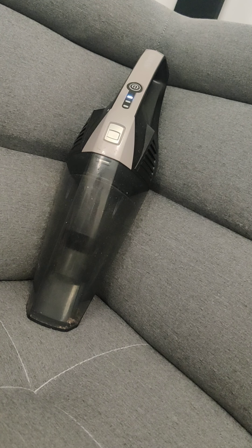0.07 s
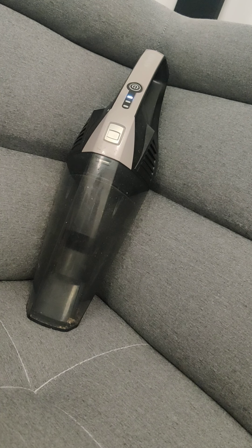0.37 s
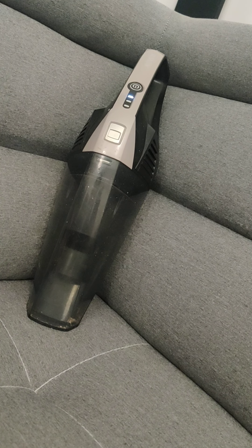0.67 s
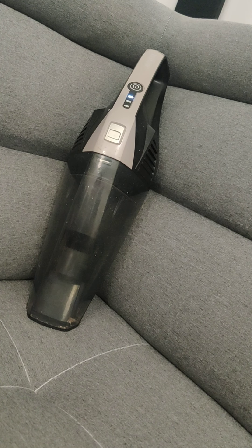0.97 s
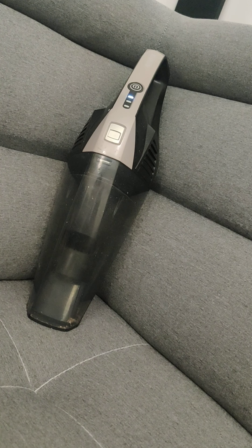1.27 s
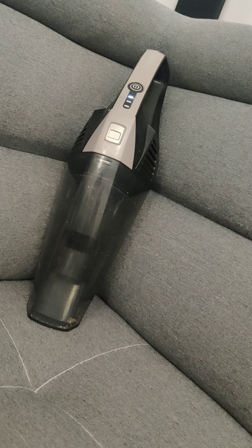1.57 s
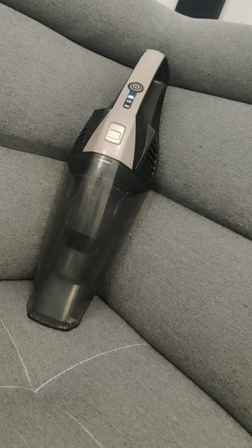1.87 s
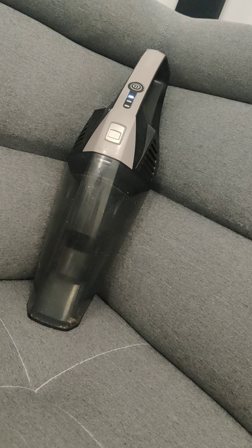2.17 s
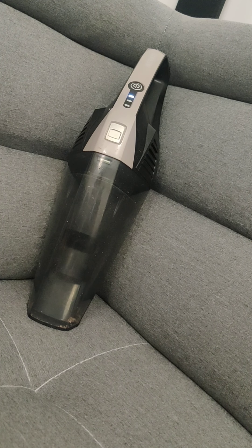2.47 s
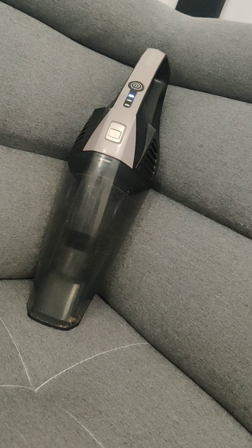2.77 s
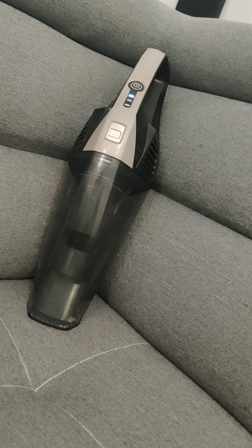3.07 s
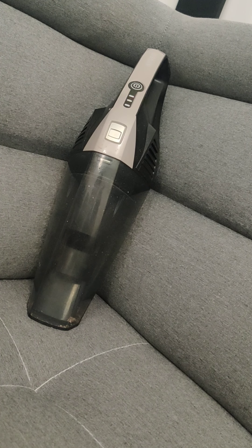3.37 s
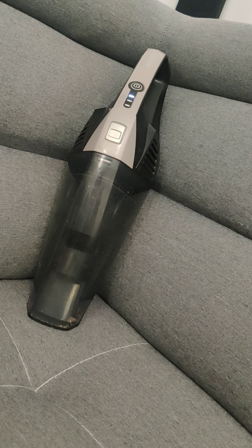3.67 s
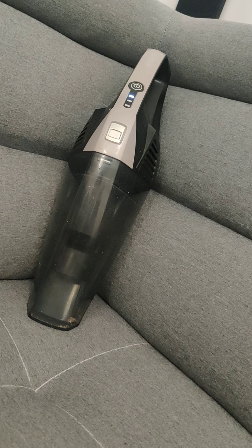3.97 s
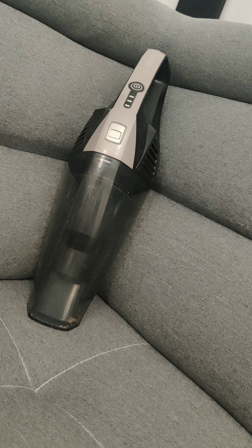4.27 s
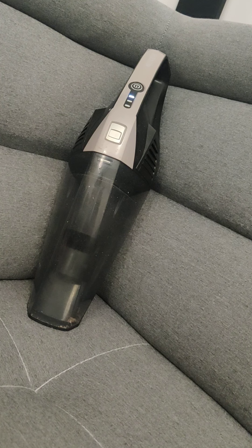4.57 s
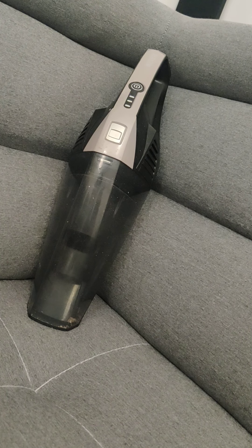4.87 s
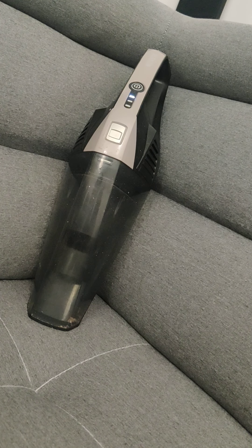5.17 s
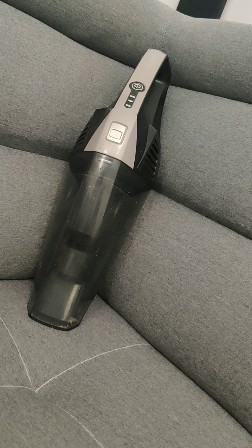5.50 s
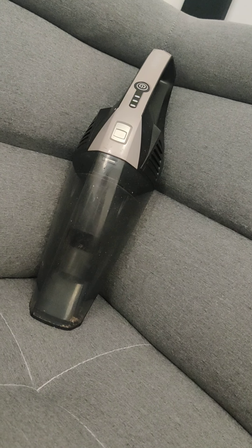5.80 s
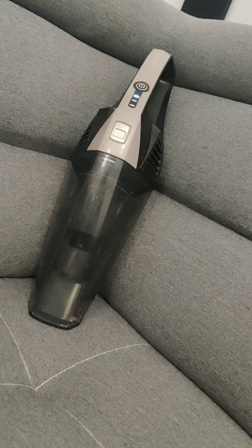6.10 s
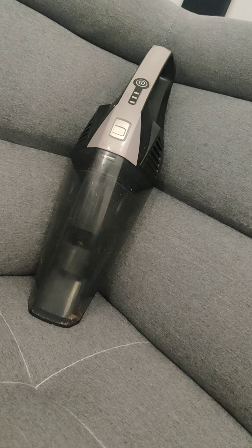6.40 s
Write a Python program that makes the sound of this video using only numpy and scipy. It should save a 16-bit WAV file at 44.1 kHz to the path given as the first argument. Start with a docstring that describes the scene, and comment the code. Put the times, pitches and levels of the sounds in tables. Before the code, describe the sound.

A handheld vacuum runs with a wavering high whine and rushing air, then switches off and winds down to a low hum.

```python
"""A cordless hand vacuum lies on a sofa, its seven-blade fan whining as the motor speeds up and slows.
After three seconds the power is cut: the rush of air dies, the whine glides down, and the bearings
and the off-balance rotor are left humming. Under it are a faint room hiss and a few deep hand bumps.
Near the end something soft, like a sleeve, brushes close to the microphone."""
import sys
import numpy as np
from scipy import signal
from scipy.fft import rfft, irfft, next_fast_len
from scipy.io import wavfile

SR = 44100
rng = np.random.default_rng(int(sys.argv[2]) if len(sys.argv) > 2 else 0)


def digitize_waveform(pressure):
    """Quantize a signal to 16-bit integers and store it at the path in sys.argv[1].

    Rows of a 2-D input are taken as channels; values are limited to [-1, 1].
    """
    field = np.atleast_2d(pressure).T
    bounded = np.clip(field, -1, 1)
    quanta = np.round(bounded * 32767).astype(np.int16)
    wavfile.write(sys.argv[1], SR, quanta)


N = 292804
TIME = np.arange(N) / SR
FFT_SIZE = next_fast_len(N, True)
BIN_HZ = np.maximum(np.arange(FFT_SIZE // 2 + 1) * SR / FFT_SIZE, 1)

# How strongly the air outlet rings with the whine. Each row: pitch in Hz, level in dB.
WHINE_LEVELS = [(560, -75), (720, -59.5), (900, -63), (1050, -48), (1280, -44), (1400, -39), (1680, -34),
                (1820, -44.5), (2020, -45), (2280, -49.5), (2410, -42.5), (2490, -35), (2560, -28.5),
                (2640, -29)]
# Higher notes of the whine. Each row: multiple of its pitch, full-speed level in dB before the
# housing's boost, power of the speed by which it grows.
WHINE_OVERTONES = [(2, -51, 17), (3, -43, 6.6), (4, -54.5, 16)]
# Where the ducts and housing ring or dampen. Each row: centre in Hz, width in Hz,
# boost in dB for the air rush and overtones, boost in dB for the rattle.
HOUSING_RESONANCES = [(219, 27, 4, -2), (343.5, 40, 11.5, -3), (1607, 232, 10.5, 20), (2625, 290, 7.5, 6),
                      (4210, 280, 7, 2.5), (4700, 320, 0, -7), (5190, 350, 4.5, 11), (6170, 320, 7, 3),
                      (7390, 730, 2.5, -3), (10550, 520, 2, -2)]
# Tone colour of the rushing air before the housing. Each row: frequency in Hz, relative level in dB.
AIR_SPECTRUM = [(30, -22), (70, -18), (120, -6.5), (145, -20), (178, 1.5), (280, 4), (400, -2.5), (750, -3),
                (900, -10), (1100, -6.5), (1400, -6), (2150, -16.5), (2900, -5), (3700, -11), (7700, -9),
                (8500, -15.5), (15500, -23)]
# Tone colour of the rolling bearing balls. Each row: frequency in Hz, relative level in dB.
RUMBLE_SPECTRUM = [(40, -13), (75, -34), (102, -14.5), (120, -7.5), (145, -13), (210, -1.5), (370, -2.5),
                   (480, 2), (620, -9.5), (760, -10), (1000, -24), (2100, -30.5), (8000, -53), (15000, -47)]
# Tone colour of the rattle before the housing. Each row: frequency in Hz, relative level in dB.
RATTLE_SPECTRUM = [(300, -3), (1000, 8.5), (2100, -1), (3000, 6), (4500, 2), (7500, -18), (9000, -26),
                   (15000, -15)]
# How strongly the body and room ring with the hum. Each row: turns per second, level in dB.
HUM_LEVELS = [(79, -67), (88, -48), (95, -33.5), (101, -35), (106.5, -45.5), (112, -37.5), (120, -45),
              (128, -39.5), (150, -51.5), (200, -47), (235, -40.5), (260, -41), (325, -28.5), (345, -37),
              (377, -34)]
# Tone colour of the room and microphone hiss. Each row: frequency in Hz, relative level in dB.
BACKGROUND_SPECTRUM = [(12, -4), (30, 10), (60, 6), (300, 10), (500, -7), (900, -15), (3000, -14),
                       (9000, -20), (15000, -14)]
# Bumps of the hand on the microphone. Each row: peak time in seconds, level in dB, half length in seconds.
HAND_BUMPS = [(1.75, -40, .03), (1.92, -46, 0.087), (6.03, -48, 0.065), (6.455, -51, 0.11)]
# Notes that come and go as the rotor slows. Each row: multiple of the rotor speed, peak level in dB,
# turns per second at that peak, width in octaves.
COASTING_NOTES = [(14, -43.5, 301, 0.1), (14, -48, 255, 0.084), (2, -41, 249, 0.16), (2, -47, 169, 0.23),
                  (2.58, -47.5, 180, 0.096), (2.58, -45.5, 148.5, 0.3), (3, -50, 128, 0.39),
                  (3.58, -50.5, 119, 0.43)]
# Tone colour of rubbing cloth. Each row: frequency in Hz, relative level in dB.
CLOTH_SPECTRUM = [(40, 13), (200, 2), (700, 2), (1150, 8.5), (1600, 0), (2200, -1.5), (3000, -3),
                  (4500, -4.5), (6500, -1), (7700, -1.5), (8600, -16), (15000, -9)]
# How much louder the left side is than the right. Each row: frequency in Hz, level gap in dB.
LEFT_BOOST = [(40, 6), (100, 0.5), (122, -6.5), (160, 1), (220, 0), (380, 3), (700, -0.5), (1300, 2.5),
              (2500, 4.5), (4400, 5.5), (6300, -2.5), (7800, -1), (9500, 3.5), (15000, 1.5)]
# How far the left side's wave runs ahead. Each row: frequency in Hz, phase in radians.
LEFT_LEAD = [(0, 0), (330, 0.61), (780, 1.5), (1400, 3), (2150, 6.5), (2650, 7.5), (5170, 11.5),
             (6120, 12.5), (7580, 17), (10400, 26), (16000, 36.5)]
# How much of the sound both sides have in common. Each row: frequency in Hz, share from 0 to 1.
STEREO_SHARE = [(60, 1), (300, 1), (750, 1), (1500, 0.64), (2100, 0.32), (3000, 0.76), (5200, 0.37),
                (6200, 0.67), (7100, 0.3), (15000, 0.17)]

BLADES, FULL_SPEED_HZ = 7, 360  # rotor speeds are in turns per second
POWER_OFF_S = 3.0


def from_db(db):
    """Turn decibels into a gain to multiply by."""
    return 10 ** (np.asarray(db) / 20)


def unit_power(x):
    """Scale a signal to an average power of 1."""
    return x / np.sqrt(np.mean(x ** 2) + 1e-20)


def look_up(table, hz):
    """Read between a table's rows, with octaves evenly spaced."""
    row_hz, value = np.transpose(table)
    return np.interp(np.log(hz), np.log(row_hz), value)


def drift(rate_hz, count=1):
    """Rows of smooth random wandering, typically about 1 in size."""
    white = rfft(rng.standard_normal((count, FFT_SIZE)))
    return unit_power(irfft(white / (1 + (BIN_HZ / rate_hz) ** 2), FFT_SIZE)[:, :N])


def swell_at(peak_s, db, rise_s, fall_s):
    """A bell-shaped gain with its own rise and fall times."""
    return from_db(db) * np.exp(-((TIME - peak_s) / np.where(TIME < peak_s, rise_s, fall_s)) ** 2)


def gain_by_speed(speed, db, loudest_hz, growth, easing):
    """A gain that grows as a power of the speed up to its peak, then eases off."""
    ratio = speed / loudest_hz
    return from_db(db) * np.minimum(ratio ** growth, ratio ** -easing)


def stereo_gains(hz):
    """Level and phase for each side: sound reaches the left first, and mostly louder."""
    row_hz, radians = np.transpose(LEFT_LEAD)
    side = np.array([[.5], [-.5]])
    lead = np.interp(hz, row_hz, radians)
    return from_db(look_up(LEFT_BOOST, hz) * side) * np.exp(1j * side * lead)


def stereo_blend(rows, hz):
    """Mix three random signals into two: the first is shared, the others go to one side each."""
    share = look_up(STEREO_SHARE, hz)
    return np.sqrt(share) * rows[0] + np.sqrt(1 - share) * rows[1:]


def noise(spectrum_db):
    """Stereo noise with the given tone colour and a power of 1."""
    white = stereo_blend(rfft(rng.standard_normal((3, FFT_SIZE))), BIN_HZ)
    coloured = white * stereo_gains(BIN_HZ) * from_db(spectrum_db)
    return unit_power(irfft(coloured, FFT_SIZE)[:, :N])


def tone(hz, rough, flutter_hz):
    """A gliding note whose strength and phase are shaken by churning air."""
    flutter = drift(flutter_hz, count=3) + 1j * drift(flutter_hz, count=3)
    shake = 1 + rough * stereo_blend(flutter, hz)
    wave = np.exp(2j * np.pi * np.cumsum(hz) / SR)
    keep_power = np.sqrt(2 / (1 + 2 * rough ** 2))
    return keep_power * np.real(shake * stereo_gains(hz) * wave)


def housing_boost(hz):
    """The housing's ringing as two boosts in dB: one for air sounds, one for the rattle."""
    centre, width, *boosts = np.transpose(HOUSING_RESONANCES)
    distance = (hz - centre[:, None]) / width[:, None]
    return np.array(boosts) @ np.exp(-2 * np.minimum(distance ** 2, 20))


def rotor_speed(running_hz=360.8, swing_hz=15.2, period_s=0.416, first_peak_s=0.339):
    """The speed zigzags under power, then falls as air drag and steady friction brake the rotor."""
    sharpness = 0.97  # near 0 is a smooth wave, 1 is a pointed zigzag
    cycle = 2 * np.pi * (np.minimum(TIME, POWER_OFF_S) - first_peak_s) / period_s
    driven = running_hz + swing_hz * np.arcsin(sharpness * np.cos(cycle)) / np.arcsin(sharpness)
    drag, friction = 155.8, 29.83  # Hz lost per second at full speed; drag goes as speed squared
    even_hz = FULL_SPEED_HZ * np.sqrt(friction / drag)  # here both brakes are equally strong
    coast_s = np.maximum(TIME - POWER_OFF_S, 0)
    speed = even_hz * np.tan(np.arctan(driven / even_hz) - coast_s * friction / even_hz)
    return np.maximum(speed, 1)


def fan_whine(speed):
    """Blades pass the outlet seven times a turn; as they slow, the note gets purer and overtones fade."""
    blade_hz, flow = BLADES * speed, speed / FULL_SPEED_HZ
    whine = from_db(look_up(WHINE_LEVELS, blade_hz)) * tone(blade_hz, rough=0.41 * flow, flutter_hz=42.3)
    for multiple, db, growth in WHINE_OVERTONES:
        hz = multiple * blade_hz
        boost_db, _ = housing_boost(hz)
        whine += from_db(db + boost_db) * flow ** growth * tone(hz, rough=0.67, flutter_hz=60)
    return whine


def air_swirl(speed, full_speed_db=-40.5, speed_share=.61, growth=3.4):
    """A whirl of air circles more slowly than the fan and gives a blurred low note."""
    gain = from_db(full_speed_db) * (speed / FULL_SPEED_HZ) ** growth
    return gain * tone(speed_share * speed, rough=0.57, flutter_hz=18.3)


def air_rush(speed, full_speed_db=-27.5, growth=3.21):
    """Air churns through the ducts, growing about as the cube of the speed."""
    boost_db, _ = housing_boost(BIN_HZ)
    gain = from_db(full_speed_db) * (speed / FULL_SPEED_HZ) ** growth
    return gain * noise(look_up(AIR_SPECTRUM, BIN_HZ) + boost_db)


def bearings(speed, throb=0.27, grain_db=2.0):
    """Balls rumble in their tracks and rattle the housing; the rattle throbs once a turn."""
    _, boost_db = housing_boost(BIN_HZ)
    angle = 2 * np.pi * np.cumsum(speed) / SR
    load = (1 + throb * np.cos(angle)) * from_db(grain_db * drift(rate_hz=70))
    rattle = unit_power(load * noise(look_up(RATTLE_SPECTRUM, BIN_HZ) + boost_db))
    rumble = noise(look_up(RUMBLE_SPECTRUM, BIN_HZ))
    rumble_gain = gain_by_speed(speed, db=-37, loudest_hz=210, growth=1.98, easing=0.31)
    rattle_gain = gain_by_speed(speed, db=-41, loudest_hz=235, growth=2.88, easing=1.4)
    return rumble_gain * rumble + rattle_gain * rattle


def rotor_hum(speed):
    """The off-balance rotor shakes the body once a turn; the hum gets purer as the air flow dies."""
    rough = 0.3 * (speed / FULL_SPEED_HZ) ** 2
    return from_db(look_up(HUM_LEVELS, speed)) * tone(speed, rough, flutter_hz=20)


def room_echoes(sound, echo_db=-4.5, fade_60db_s=0.19, count=40):
    """Add the few quick echoes of a furnished room, which colour the sound above the bass."""
    response = np.zeros((2, SR // 10))
    for side in response:
        delay_s = rng.uniform(.003, .07, count)
        side[(delay_s * SR).astype(int)] = rng.choice([-1, 1], count) * from_db(-60 * delay_s / fade_60db_s)
    response /= np.linalg.norm(response, axis=1, keepdims=True)
    echoes = signal.fftconvolve(sound, response, axes=1)[:, :N]
    bass_cut = signal.butter(2, 800, "high", fs=SR, output="sos")
    return sound + from_db(echo_db) * signal.sosfilt(bass_cut, echoes)


def background(level_db=-56.5):
    """The quiet room and the microphone give a faint, steady noise."""
    return from_db(level_db) * noise(look_up(BACKGROUND_SPECTRUM, BIN_HZ))


def hand_bumps(bottom_hz=20, top_hz=38):
    """The grip on the microphone shifts, making short swells of very deep rumble."""
    swells = sum(swell_at(peak_s, db, half_s, half_s) for peak_s, db, half_s in HAND_BUMPS)
    deep_band_db = -10 * np.log10(1 + (BIN_HZ / top_hz) ** 8 + (bottom_hz / BIN_HZ) ** 4)
    return swells * noise(deep_band_db)


def coasting_notes(speed):
    """Shaft, bearing and blade notes swell as they slide through pitches where the body rings."""
    notes = 0
    for multiple, db, loudest_hz, octaves in COASTING_NOTES:
        swell = 1 / (1 + (np.log2(speed / loudest_hz) / octaves) ** 4)
        notes += from_db(db) * swell * tone(multiple * speed, rough=0.35, flutter_hz=5)
    return notes


def sleeve(hiss_above_hz=4200):
    """Cloth brushes past once: a dull rub that turns to hiss."""
    cloth = noise(look_up(CLOTH_SPECTRUM, BIN_HZ))
    dull = signal.sosfiltfilt(signal.butter(2, hiss_above_hz, fs=SR, output="sos"), cloth)
    rub = swell_at(peak_s=6.24, db=-49, rise_s=0.41, fall_s=0.26) * dull
    hiss = swell_at(peak_s=6.32, db=-48.5, rise_s=0.4, fall_s=0.19) * (cloth - dull)
    return rub + hiss


def scene():
    """One rotor speed drives every part of the vacuum; the room and nearby sounds join it."""
    speed = rotor_speed()
    air = fan_whine(speed) + air_swirl(speed) + air_rush(speed)
    vacuum = air + bearings(speed) + coasting_notes(speed) + rotor_hum(speed)
    return room_echoes(vacuum) + sleeve() + hand_bumps() + background()


def record(dry, cutoff_hz=15800):
    """Cut off the very highest treble steeply."""
    return signal.sosfilt(signal.ellip(12, .1, 90, cutoff_hz, fs=SR, output="sos"), dry)


dry = scene()
out = record(dry)
digitize_waveform(out)
```